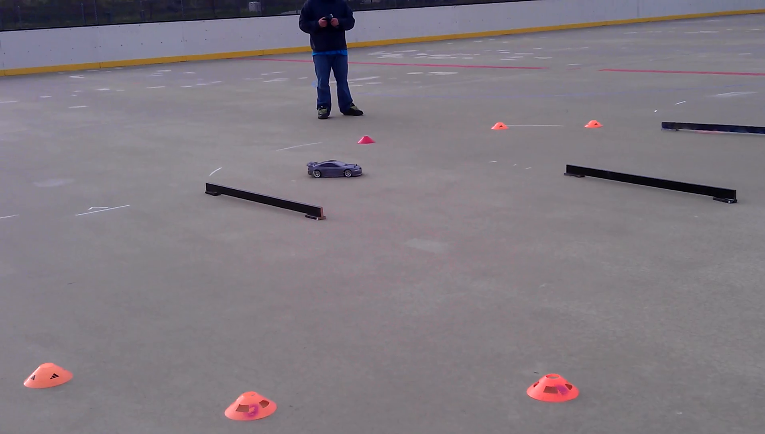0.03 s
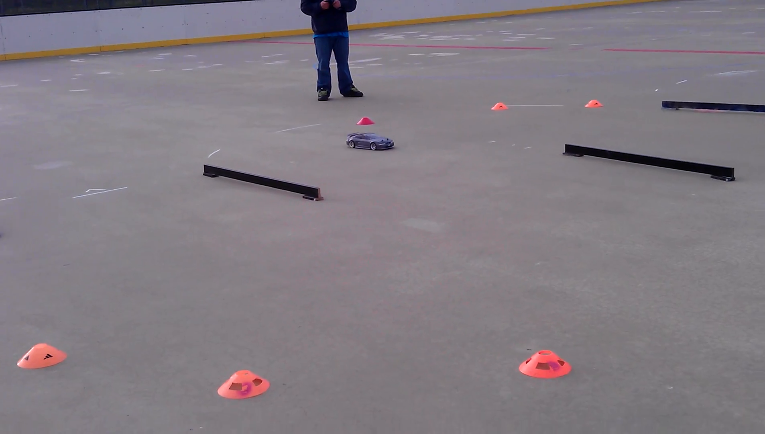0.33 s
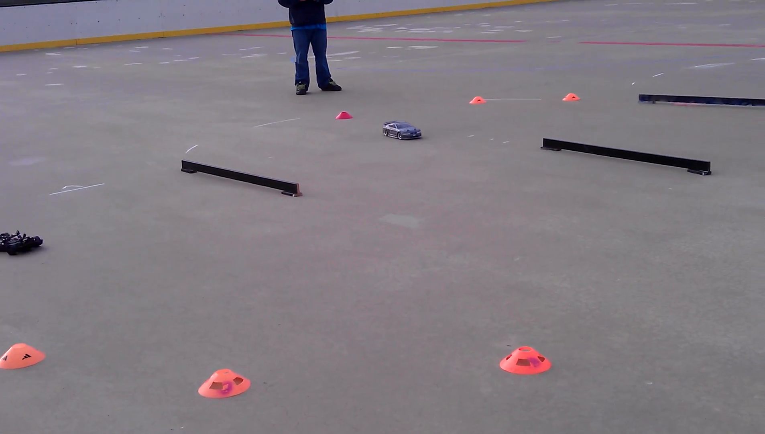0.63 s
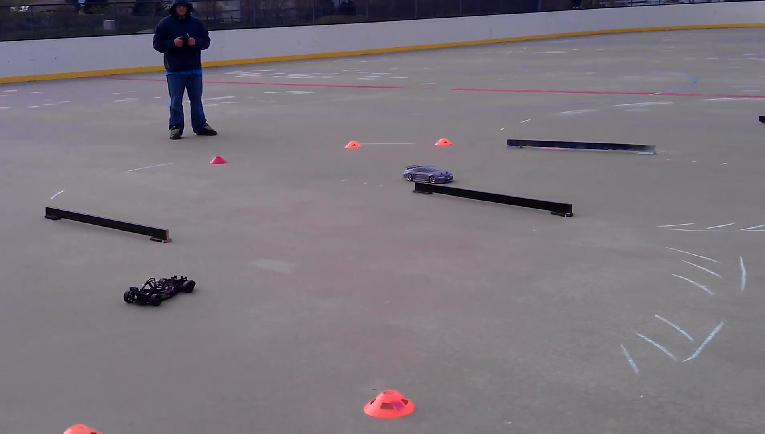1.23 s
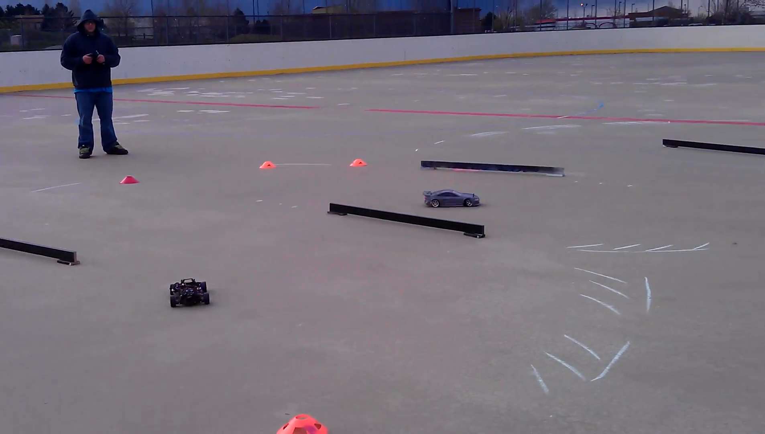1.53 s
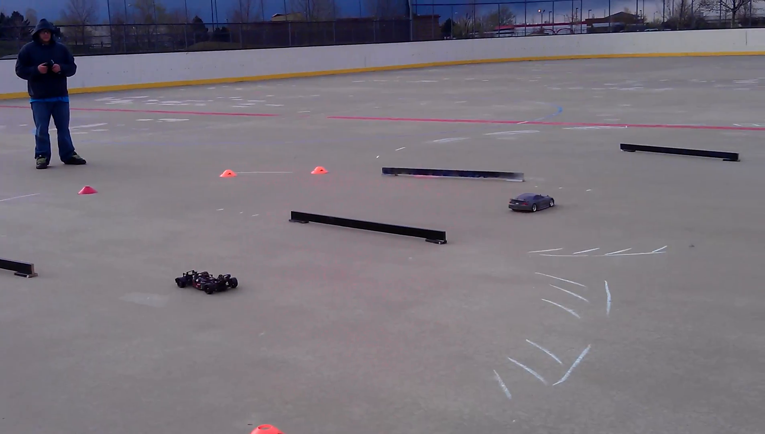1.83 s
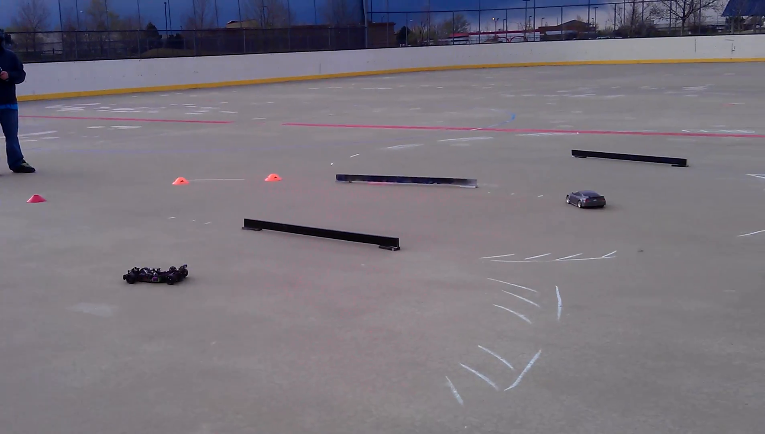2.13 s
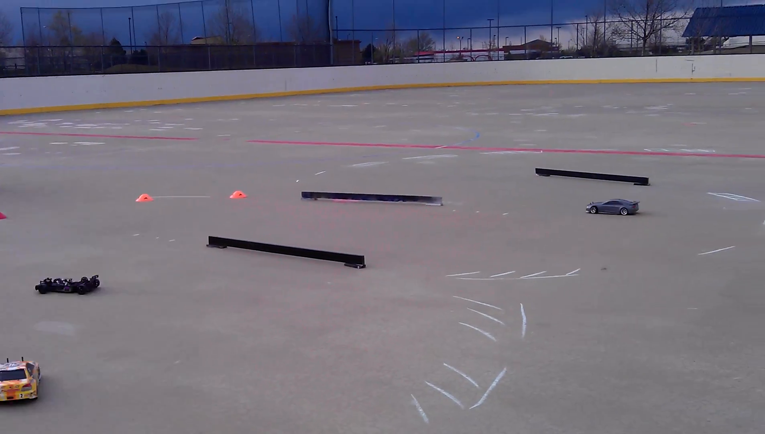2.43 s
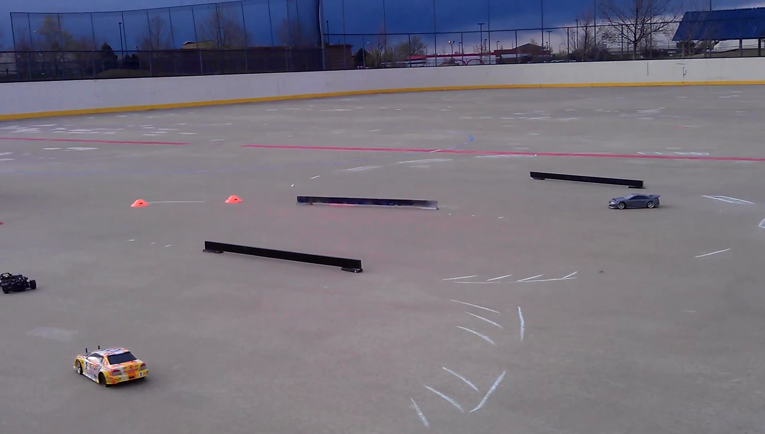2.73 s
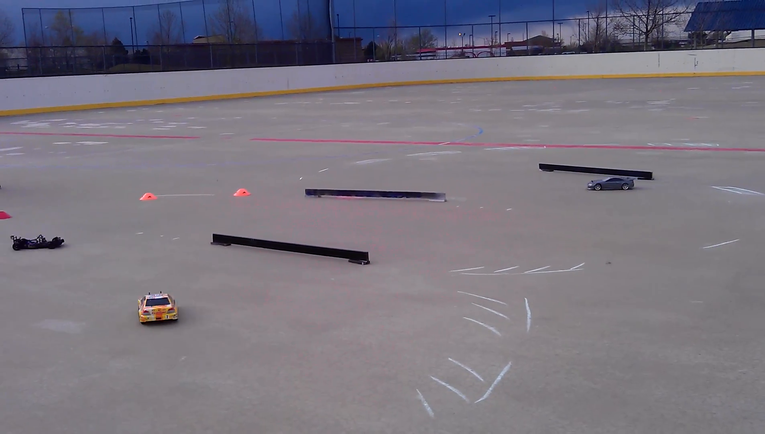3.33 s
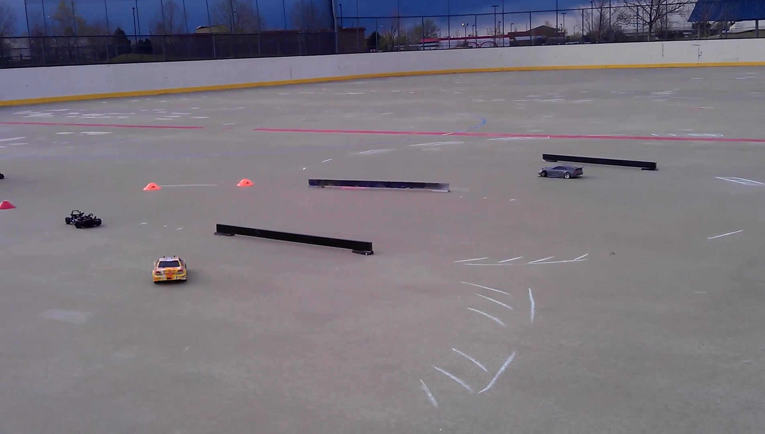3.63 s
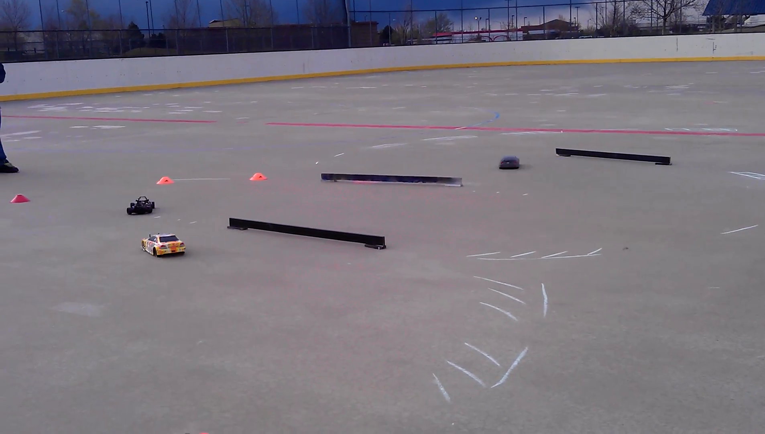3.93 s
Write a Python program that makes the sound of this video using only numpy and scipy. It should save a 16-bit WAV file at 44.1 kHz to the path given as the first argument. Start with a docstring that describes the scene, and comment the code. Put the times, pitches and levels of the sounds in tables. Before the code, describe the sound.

Small remote-control cars drift on outdoor concrete, their plastic tyres hissing and grating throughout over a low rolling roar, surging near 1 second and loudest at 2. Gears whine from 0.3 to 1 second and rise again from 2.8 to 3.5, among short high motor zips. Grit ticks a few times after 2 seconds. Wind bumps the microphone near 0.5 and 3.6 seconds, and a faint distant hum swells midway.

```python
"""Hard plastic tyres hiss and grate as small electric model cars drift round a concrete outdoor rink.
Each slide is a mass of tiny impacts, coloured by the body shells, over a low rolling roar.
Gears whine, motors zip up with the throttle, grit ticks on a chassis; the boards throw these back.
Gusts brush the microphone and something hums far away."""
import sys
import numpy as np
from scipy import signal
from scipy.fft import rfft, irfft
from scipy.io import wavfile
from scipy.ndimage import uniform_filter1d

SR = 44100
rng = np.random.default_rng(int(sys.argv[2]) if len(sys.argv) > 2 else 0)


def digitize_waveform(pressure):
    """Quantize a signal to 16-bit integers and store it at the path in sys.argv[1].

    Rows of a 2-D input are taken as channels; values are limited to [-1, 1].
    """
    field = np.atleast_2d(pressure).T
    bounded = np.clip(field, -1, 1)
    quanta = np.round(bounded * 32767).astype(np.int16)
    wavfile.write(sys.argv[1], SR, quanta)


N = 176400
T = np.arange(N) / SR
HZ = np.fft.rfftfreq(N, 1 / SR)
SPUR_TEETH, GEAR_THROB, GEAR_WAVER = 68, 0.4, 0.024


def tyres():
    """Sliding tyres: bright hiss and lower grating, coloured by the shells, shaken by wheel chatter."""
    # hiss and grating envelopes: time_s, level_db
    hiss = [(0, -37.5), (.065, -24.5), (.15, -27), (.28, -31.5), (.37, -25.5), (.5, -27.5), (.6, -32.5),
            (.69, -25), (.97, -26.5), (1.03, -20), (1.16, -23.5), (1.4, -31), (1.6, -33), (1.65, -29.5),
            (1.78, -33.5), (1.95, -23.5), (2.0, -16), (2.05, -17), (2.13, -20.5), (2.44, -31), (2.55, -21),
            (2.63, -27.5), (2.76, -30), (2.81, -26), (2.9, -29), (3.01, -33), (3.07, -24.5), (3.27, -31.5),
            (3.37, -31), (3.5, -30.5), (3.6, -28), (3.7, -26.5), (4, -37)]
    grating = [(0, -40), (.1, -29), (.26, -32.5), (.41, -26), (.6, -33.5), (.7, -27), (.96, -30),
               (1.07, -25.5), (1.45, -34.5), (1.77, -34), (2.04, -24.5), (2.2, -31), (2.43, -34),
               (2.55, -30), (2.7, -34.5), (2.84, -32.5), (2.97, -36.5), (3.1, -30.5), (3.3, -33.5),
               (3.52, -32.5), (3.68, -28), (4, -39)]
    # tyre spectra before and after the cars turn: freq_hz, density_db
    tyre_early = [(800, -30), (1500, -10.5), (2100, -7), (2900, -7), (4300, -7), (6000, -7.5), (7100, -10),
                  (8500, -5), (9600, -3.5), (10700, -5.5), (11900, -12), (13900, -19.5), (15000, -34)]
    tyre_late = [(800, -46), (1500, -13), (1800, -3.5), (2400, -5.5), (3200, -4), (4200, -4.5), (5000, -1),
                 (6200, 0), (7400, -0.5), (8500, -3.5), (9400, 0), (10700, -3.5), (12100, -10.5),
                 (13200, -10), (14400, -32), (15000, -38)]
    # shell resonances before and after the turn: freq_hz, lift_db
    shell_early = [(2640, 5.5), (3090, 8), (3620, 6.5), (4220, 7.5), (4780, 1), (5330, 6.5)]
    shell_late = [(3930, 2), (4780, 1.5), (5200, 0), (6150, 2.5), (7820, 2), (9650, 4), (11800, 7.5)]
    # slide position: time_s, left_right_db
    side = [(0, -2), (.35, -0.5), (.9, -2), (1.05, 0), (1.4, -2), (3.2, 0)]
    turn_s, split_hz = (0.5, 1.66), 4760
    turn = np.interp(T, turn_s, (0, 1))
    highpass = 1 / (1 + (split_hz / (HZ + 1)) ** 8)
    early_colour = amp(spectrum(tyre_early) + shell(shell_early))
    late_colour = amp(spectrum(tyre_late) + shell(shell_late))
    rub = pair(grit)
    slides = np.zeros((2, N))
    for band, level_db in (highpass, curve(hiss) - 1), (1 - highpass, curve(grating) - 1.76):
        early = coloured(rub, early_colour * band)
        late = coloured(rub, late_colour * band)
        slides += (early * (1 - turn) + late * turn) * amp(level_db)
    chatter_db = 0.78 * wander(rate_hz=54)
    return shimmer(slides * pan(curve(side))) * amp(chatter_db)


def grit(hits_per_s=6000, spread_db=2.8):
    """Tiny impacts of plastic on concrete over a smooth rub of equal power."""
    sizes = amp(spread_db * np.minimum(rng.exponential(1, N), 5))
    signs = np.sign(rng.random(N, dtype=np.float32) - 0.5)
    hits = sizes * signs * (rng.random(N) < hits_per_s / SR)
    return np.sqrt(0.5) * (unit(hits) + noise())


def shell(peaks, half_width_hz=70):
    """Lift in dB from body shell resonances."""
    return sum(db / (1 + ((HZ - hz) / half_width_hz) ** 2) for hz, db in peaks)


def shimmer(x, depth_db=2.3):
    """Narrow peaks come and go in the hiss as the cars move."""
    frames = signal.stft(x, nperseg=1024, noverlap=768)[2]
    patches = uniform_filter1d(rng.standard_normal(frames.shape[1:]), size=3, axis=0)
    patches = uniform_filter1d(patches, size=24, axis=1)
    frames *= amp(depth_db * np.minimum(unit(patches), 2))
    return signal.istft(frames, nperseg=1024, noverlap=768)[1][:, :N]


def rolling():
    """Hollow roar of wheels under the body shells."""
    # roar envelope: time_s, level_db
    envelope = [(0.0, -39), (0.12, -35.5), (1.01, -33), (1.04, -29.5), (1.51, -38.5), (2.1, -31),
                (2.38, -38.5), (2.57, -33), (2.75, -38), (3.23, -34), (3.39, -37), (3.7, -31.5), (4.0, -41)]
    # roar spectrum: freq_hz, density_db
    colour = [(60, -35), (150, -8), (270, -2.5), (380, -8.5), (490, 0.5), (600, -2), (770, 2.5), (930, 0),
              (1250, -0.5), (1500, -8.5), (2000, -32), (4000, -40)]
    roar = coloured(pair(grit), amp(spectrum(colour)))
    return roar * amp(curve(envelope) + 1.5 + 0.37 * wander(rate_hz=50))


def drives():
    """Gears, motors and chassis ticks of all cars, in mono."""
    # gear whine per run: time_s, mesh_hz, level_db, roughness
    first_run = [(.32, 3000, -37, 1), (.42, 3080, -33, 1), (.6, 3050, -45, 0.74), (.7, 3040, -30, 0.72),
                 (.76, 3040, -33, 0.55), (.785, 3125, -30, 0.4), (.82, 3100, -32, 0.45),
                 (.885, 3155, -27, 0.25), (.92, 3130, -28, 0.38), (1.0, 2860, -44, 0.9)]
    coast = [(1.2, 2343, -41.5, 0.79), (1.5, 2105, -46, .6), (1.7, 2010, -59, 0.54)]
    second_run = [(2.8, 1896, -47, 0.98), (2.96, 2574, -36, 0.73), (2.98, 2900, -39, 0.48),
                  (3.09, 3200, -33, .7), (3.14, 3370, -44, 0.52), (3.26, 3450, -41, 0.57),
                  (3.295, 3460, -37, .45), (3.43, 3550, -37.5, .5), (3.49, 3520, -52, 0.74)]
    # throttle blips: start_s, length_s, from_hz, top_hz, level_db
    blips = [(0.0, 0.13, 4600, 10500, -33), (.315, 0.095, 8700, 11300, -24), (.98, 0.089, 9000, 11700, -27),
             (1.92, 0.1, 5160, 8100, -29), (2.462, .11, 3890, 7560, -41), (2.777, 0.077, 8650, 9800, -29),
             (3.02, 0.065, 5370, 6900, -39), (3.555, 0.097, 8300, 11660, -28)]
    # throttle dabs at steady speed: start_s, length_s, pitch_hz, level_db
    chirps = [(0.087, .13, 473, -44), (1.974, 0.092, 4880, -37), (2.2, 0.17, 1870, -48),
              (2.555, 0.053, 3100, -41.5), (2.765, 0.1, 2790, -44.5)]
    # stray grit on a chassis: start_s, level_db, ring_hz
    ticks = [(2.045, -23, 6970), (2.544, -18, 7370), (2.556, -17, 7350), (3.081, -21, 3560),
             (3.361, -23, 3000)]
    mix = sum(gears(run) for run in (first_run, coast, coast, second_run)) + whistle()
    for source, rows in (blip, blips), (chirp, chirps), (chirp, chirps), (tick, ticks):
        for row in rows:
            add(mix, *source(*row))
    return mix


def gears(run, rattle_hz=150, fade_s=0.017):
    """Mesh tone, pure under load and rattling when slack, throbbing once per spur gear turn."""
    # mesh harmonics 1 to 3: level_db
    harmonics = (1.5, -3.5, -27)
    roughness = np.clip(curve(run, column=3), 0, 1)
    phase = spin(curve(run), GEAR_WAVER * roughness)
    depth = 1.3 * roughness
    rattle = 1 + depth * (wander(rattle_hz) + 1j * wander(rattle_hz)) / np.sqrt(2)
    tone = sum(amp(db) * (rattle * np.exp(1j * k * phase)).real for k, db in enumerate(harmonics, 1))
    throb = 1 + GEAR_THROB * np.sin(phase / SPUR_TEETH)
    whine = unit(tone * throb / np.hypot(1, depth))
    gate = np.clip(np.minimum(T - run[0][0], run[-1][0] - T) / fade_s, 0, 1)
    return whine * gate * amp(curve(run, column=2) + 0.5)


def blip(start_s, length_s, from_hz, top_hz, level_db, rasp_hz=380, release_s=0.036):
    """The wheels break loose and the motor zips raspily up to speed."""
    t = np.arange(0, length_s, 1 / SR)
    pitch_hz = from_hz + (top_hz - from_hz) * np.sin(t / length_s * np.pi / 2)
    waver = 1 + 0.045 * wander(rasp_hz)[:len(t)]
    rattle = 1 + wander(rasp_hz)[:len(t)]
    phase = 2 * np.pi * np.cumsum(pitch_hz * waver) / SR
    envelope = np.sqrt(t / length_s) * np.clip((length_s - t) / release_s, 0, 1)
    return start_s, amp(level_db) * envelope * unit(np.sin(phase) * rattle)


def chirp(start_s, length_s, pitch_hz, level_db):
    """The gears sing briefly on one note."""
    t = np.arange(0, length_s, 1 / SR)
    phase = spin(pitch_hz, 0.8 * GEAR_WAVER)[:len(t)]
    envelope = np.sin(np.pi * t / length_s)
    throb = 1 + GEAR_THROB * np.sin(phase / SPUR_TEETH)
    return start_s, amp(level_db) * unit(envelope * np.sin(phase) * throb)


def whistle():
    """Thin, fuzzy whistle of fast motors."""
    # motor whistle: time_s, pitch_hz, level_db
    track = [(.3, 9600, -46), (.9, 9150, -50), (1.15, 9400, -29), (1.4, 9600, -70), (2.2, 9060, -39),
             (2.45, 9660, -58), (3.31, 9700, -42), (3.39, 9760, -30), (3.7, 9590, -52)]
    tone = np.sin(spin(curve(track), waver=0.0162)) * wander(rate_hz=40)
    return unit(tone) * amp(curve(track, column=2))


def tick(start_s, level_db, ring_hz, decay_s=0.0041):
    """A grain strikes hard plastic."""
    t = T[:SR // 20]
    return start_s, amp(level_db) * np.sin(2 * np.pi * ring_hz * t) * np.exp(-t / decay_s)


def rink(x, wet_db=-8.5, t60_s=0.22, echoes_per_s=500):
    """Direct sound plus sparse reflections from the ground and boards."""
    t = T[:SR // 2]
    taps = rng.standard_normal((2, len(t))) * amp(-60 * t / t60_s)
    taps *= rng.random(taps.shape) < echoes_per_s / SR
    taps /= np.linalg.norm(taps, axis=1, keepdims=True)
    return x + amp(wet_db) * signal.fftconvolve(x[None], taps, axes=1)[:, :N]


def wind():
    """Lumpy buffeting on one microphone port or the other, with a few firm bumps."""
    # wind envelope: time_s, level_db
    envelope = [(0, -63), (.06, -38), (.16, -46), (.3, -60), (.4, -45), (.47, -33), (.55, -44),
                (.78, -42.5), (.86, -40.5), (1.0, -49), (1.15, -46.5), (1.6, -51), (1.9, -46.5),
                (2.13, -40), (2.25, -39.5), (2.4, -54), (2.62, -46), (2.9, -52.5), (3.12, -47.5),
                (3.36, -52.5), (3.5, -38.5), (3.58, -37), (3.67, -35), (3.73, -40.5), (3.8, -35.5),
                (3.87, -55), (4, -39.5)]
    # eddy spectrum: freq_hz, density_db
    colour = [(20, -58), (40, -63), (70, -18), (110, -9), (170, 0), (240, 1), (300, -5), (400, -6),
              (800, -54), (2000, -65)]
    # port struck: time_s, left_right_db
    side = [(.25, 8), (.45, -11), (.55, -13), (.7, 5.5), (1.2, 0), (3.3, 3.5), (3.5, 9), (3.66, -9)]
    # air puffs: centre_s, level_db, pitch_hz
    puffs = [(0.439, -21, 201), (0.462, -18, 245), (0.48, -17, 231), (0.496, -21, 180), (0.86, -28, 216),
             (3.501, -23, 232), (3.669, -20, 254)]
    bumps = np.zeros(N)
    for row in puffs:
        add(bumps, *bump(*row))
    eddies = coloured(pair(noise), amp(spectrum(colour)))
    gust_db = curve(envelope) + 3.5 + 1.5 * wander(rate_hz=23)
    return (bumps + eddies * amp(gust_db)) * pan(curve(side))


def bump(centre_s, level_db, pitch_hz, width_s=0.0055):
    """One short low puff of air."""
    t = np.arange(-4 * width_s, 4 * width_s, 1 / SR)
    tone = np.sin(2 * np.pi * (pitch_hz * t + rng.random()))
    return centre_s + t[0], amp(level_db) * tone * np.exp(-(t / width_s) ** 2)


def hum(pitch_hz=236):
    """A far-off tone that swells and fades."""
    # hum envelope: time_s, level_db
    envelope = [(0, -59), (1.0, -46.5), (1.3, -49), (1.85, -45), (2.15, -38.5), (2.65, -38), (2.95, -47),
                (4, -59)]
    tone = unit(np.sin(spin(pitch_hz, waver=0.0061)))
    return tone * amp(curve(envelope) + 1.2 * wander(rate_hz=19))


def pair(source):
    """Spectra of a random source at two partly alike microphones."""
    # channel likeness: freq_hz, correlation
    likeness = [(110, .5), (200, 1), (700, 0.82), (1280, .35), (4380, 0.4), (8080, 0.23)]
    # channel balance: freq_hz, left_right_db
    balance = [(130, -0.5), (170, 3), (220, 1), (290, 5), (640, 0), (1820, 6), (2370, 1.5), (3080, 4),
               (4010, 2), (5210, 1.5), (6780, -5), (8820, 1), (11500, 5), (14900, 1)]
    common, left, right = rfft(np.array([source() for _ in range(3)]))
    share = np.clip(spectrum(likeness), 0, 0.98)
    spectra = np.sqrt(share) * common + np.sqrt(1 - share) * np.array([left, right])
    return spectra * pan(spectrum(balance))


def coloured(spectra, colour):
    """Filtered stereo sound whose channel mean has rms 1."""
    x = irfft(spectra * colour, N)
    return x / x.mean(0).std()


def spin(hz, waver):
    """Phase of an unsteadily turning part."""
    return 2 * np.pi * np.cumsum(hz * (1 + waver * wander(rate_hz=115))) / SR


def wander(rate_hz):
    """Random drift of rms 1, rolling off above rate_hz."""
    t = T[::32]
    hz = np.fft.rfftfreq(8192, 32 / SR)
    slow = irfft(rfft(rng.standard_normal(8192)) / (1 + (hz / rate_hz) ** 4) * (hz > 1))
    return np.interp(T, t, unit(slow[:len(t)]))


def noise():
    """White noise."""
    return rng.standard_normal(N, dtype=np.float32)


def curve(rows, column=1):
    """One column of a time table at every sample."""
    rows = np.array(rows)
    return np.interp(T, rows[:, 0], rows[:, column])


def spectrum(rows):
    """A frequency table at every bin."""
    hz, value = np.transpose(rows)
    return np.interp(np.log(HZ + 1), np.log(hz + 1), value)


def amp(db):
    """Decibels to gain."""
    return 10 ** (np.asarray(db) / 20)


def unit(x):
    """Scales to rms 1."""
    return x / np.sqrt(np.mean(x ** 2) + 1e-20)


def pan(left_right_db):
    """Left and right gains."""
    return amp(np.array([left_right_db, -left_right_db]) / 2)


def add(mix, start_s, sound):
    """Mixes a sound in at start_s."""
    part = mix[max(round(start_s * SR), 0):][:len(sound)]
    part += sound[:len(part)]


def scene():
    """Cars, wind and hum; the drives sit to the left."""
    motors = drives()
    return tyres() + rolling() + rink(motors) * pan(left_right_db=8.0)[:, None] + wind() + hum()


def record(dry):
    """Low-pass at 14.7 kHz."""
    lowpass = signal.firwin(301, 14700, window=("kaiser", 9), fs=SR)
    return signal.oaconvolve(dry, lowpass[None], "same")


dry = scene()
out = record(dry)
digitize_waveform(out)
```